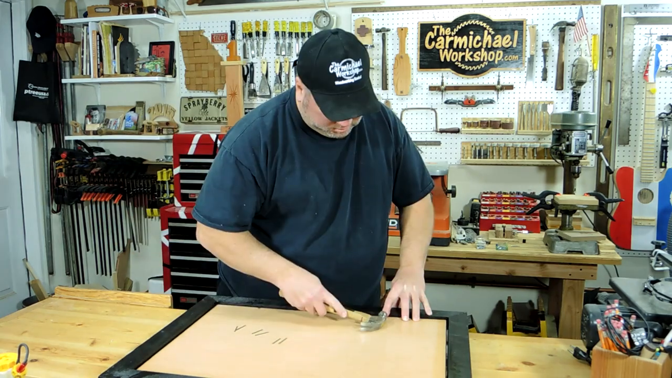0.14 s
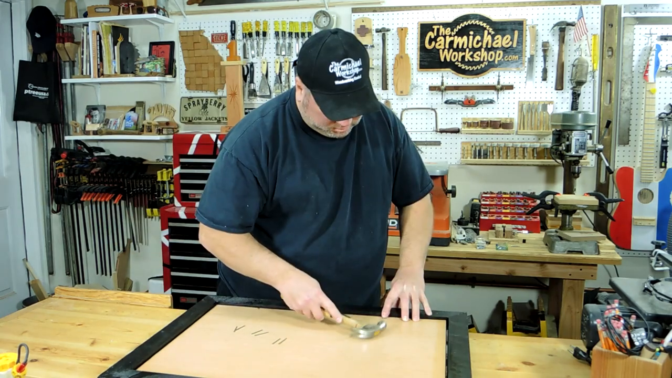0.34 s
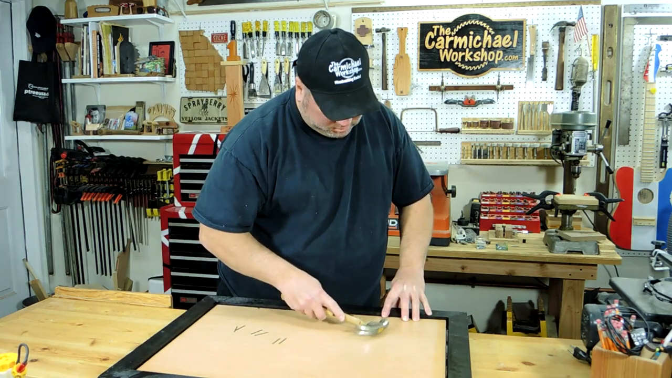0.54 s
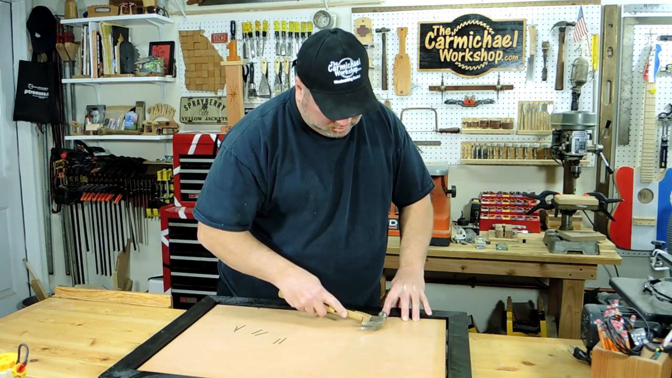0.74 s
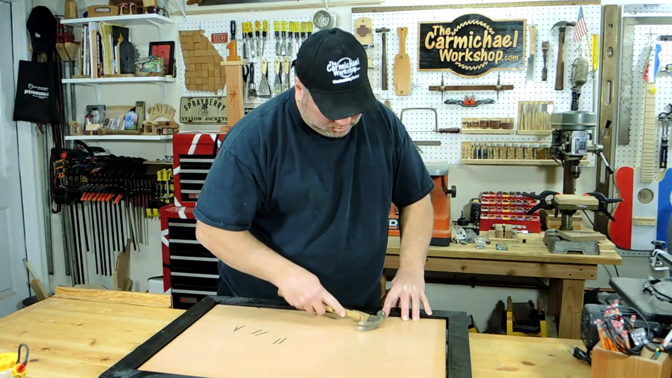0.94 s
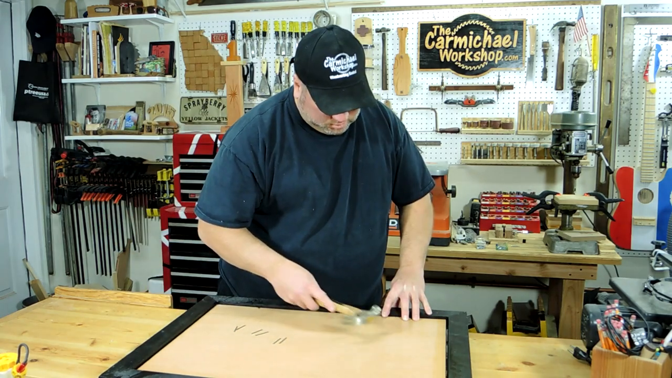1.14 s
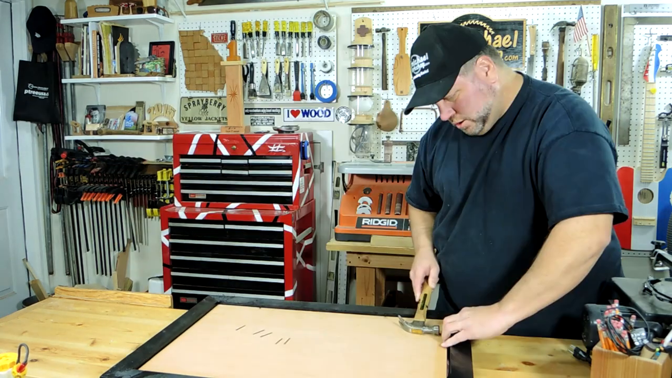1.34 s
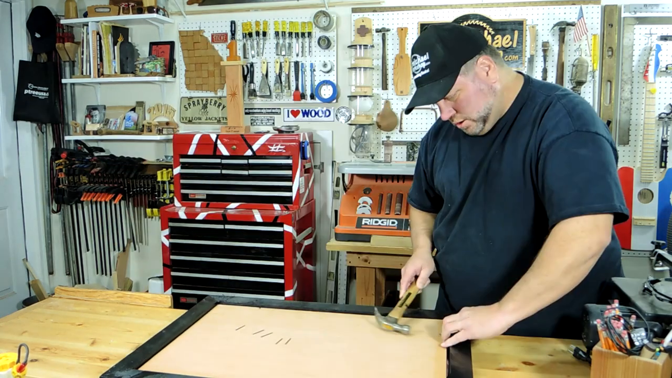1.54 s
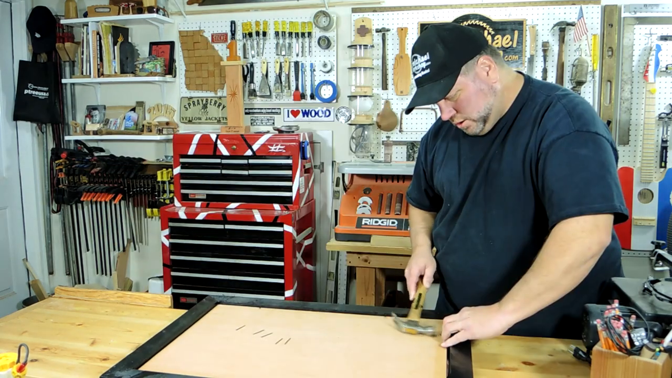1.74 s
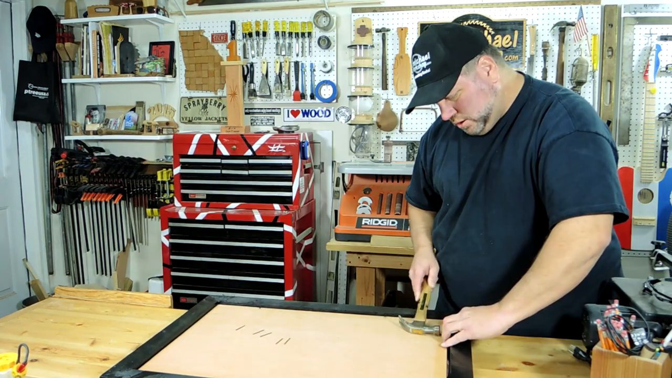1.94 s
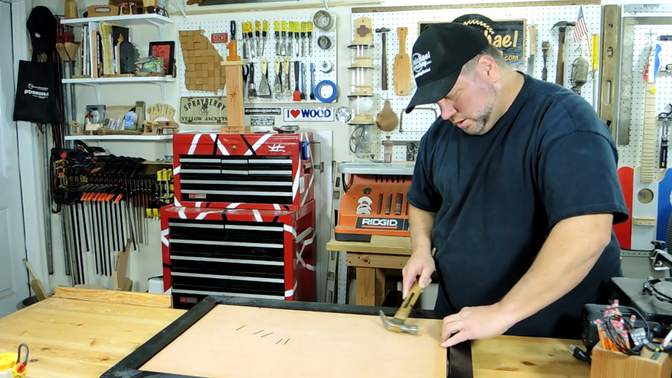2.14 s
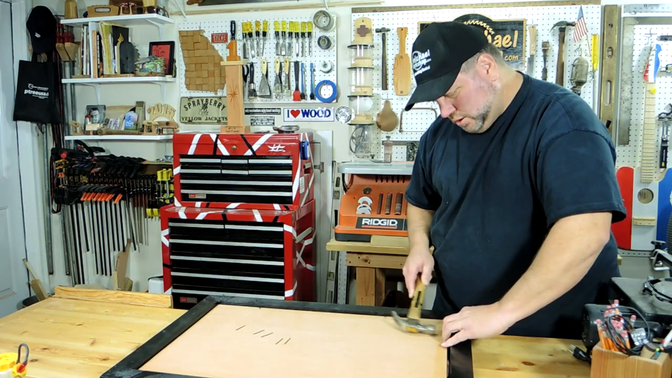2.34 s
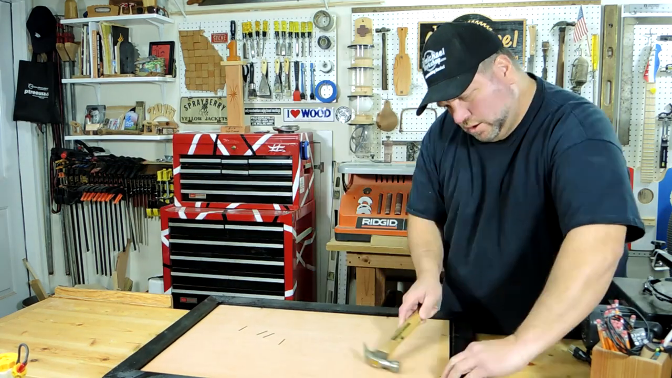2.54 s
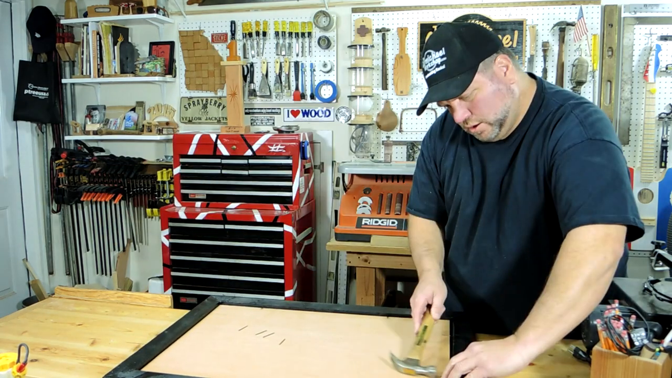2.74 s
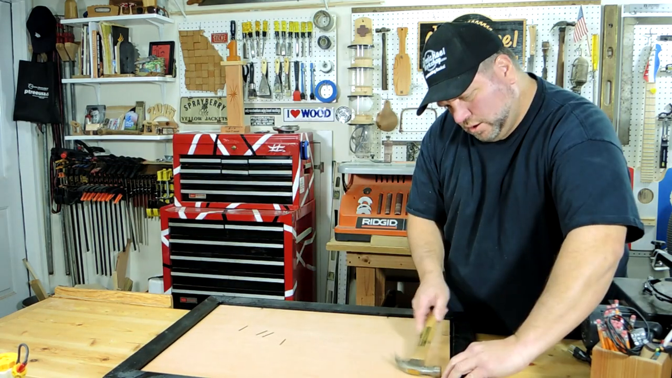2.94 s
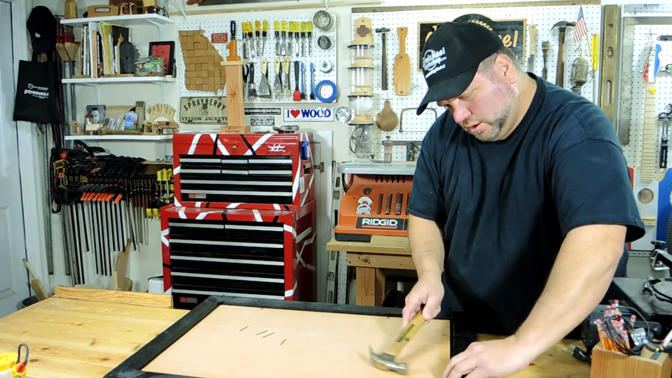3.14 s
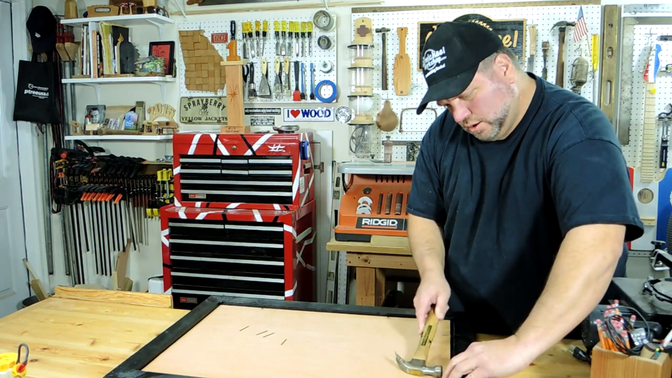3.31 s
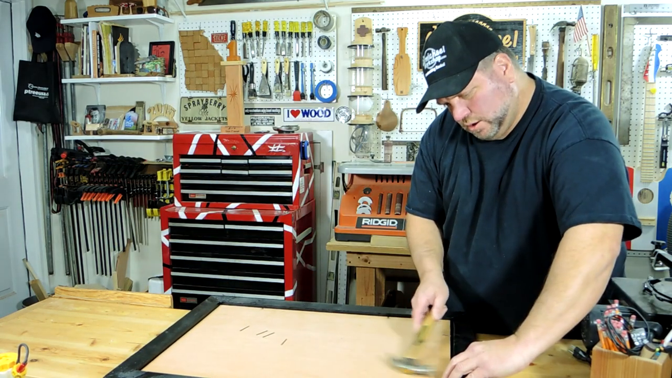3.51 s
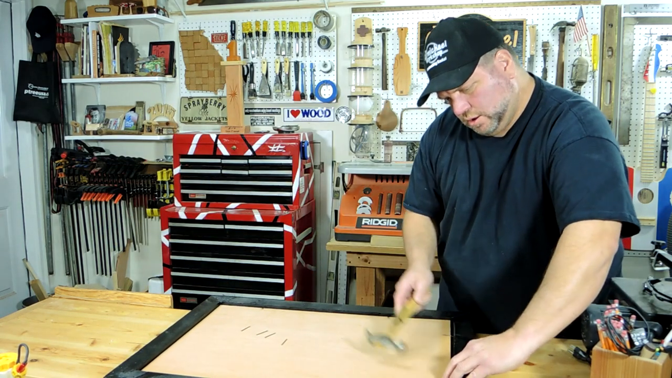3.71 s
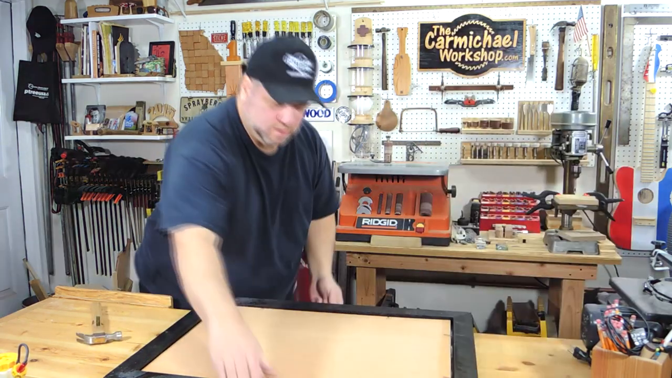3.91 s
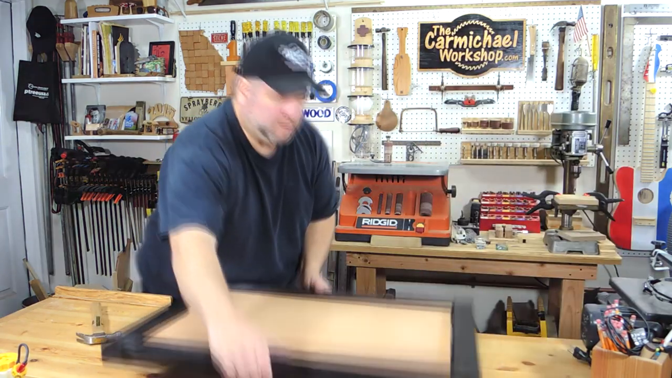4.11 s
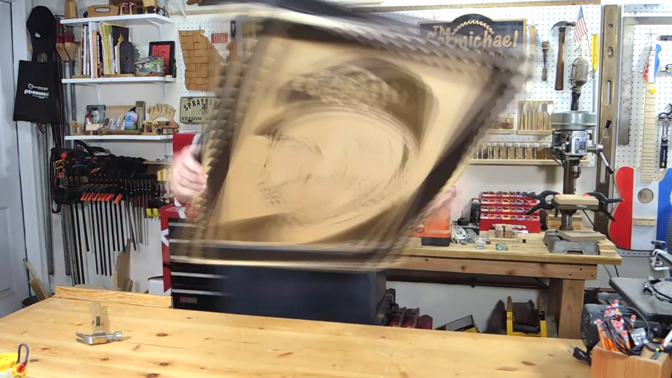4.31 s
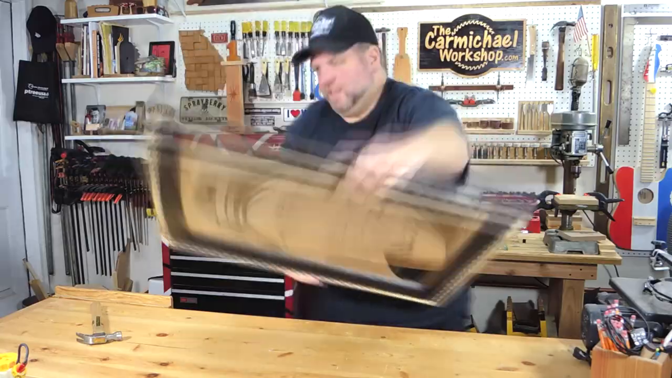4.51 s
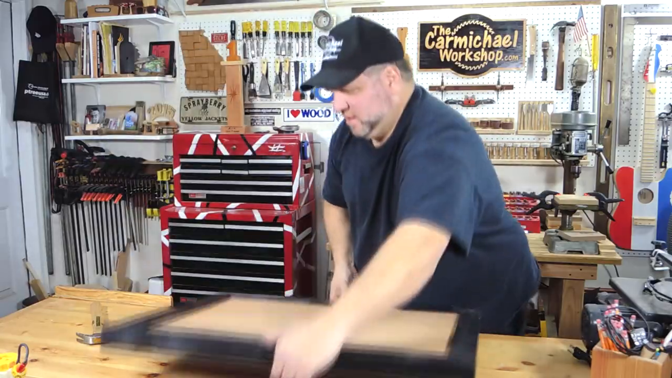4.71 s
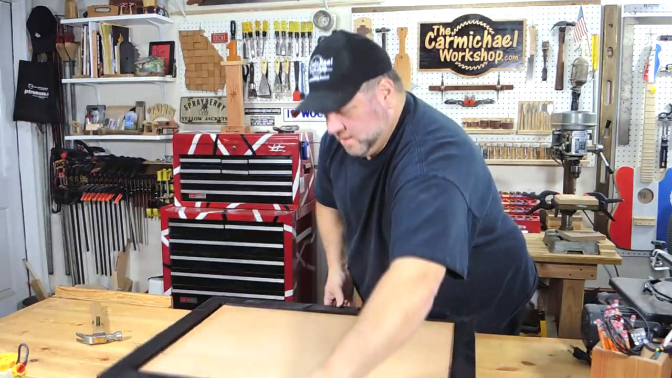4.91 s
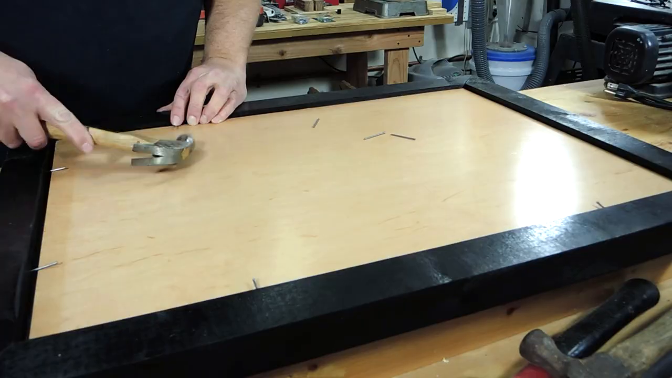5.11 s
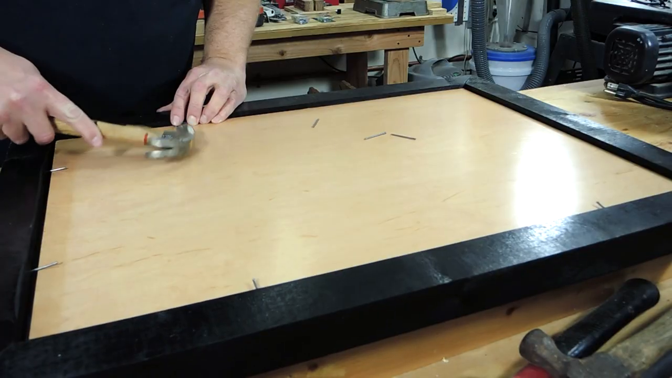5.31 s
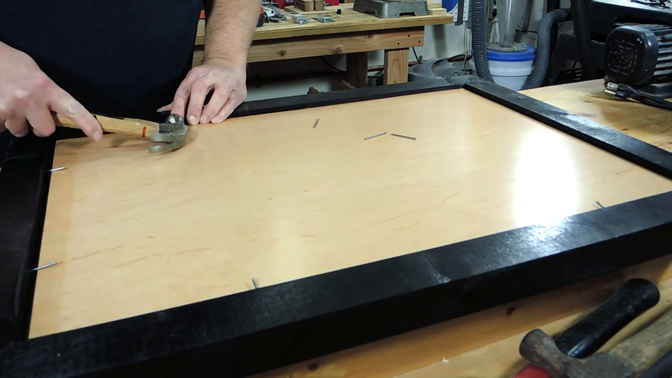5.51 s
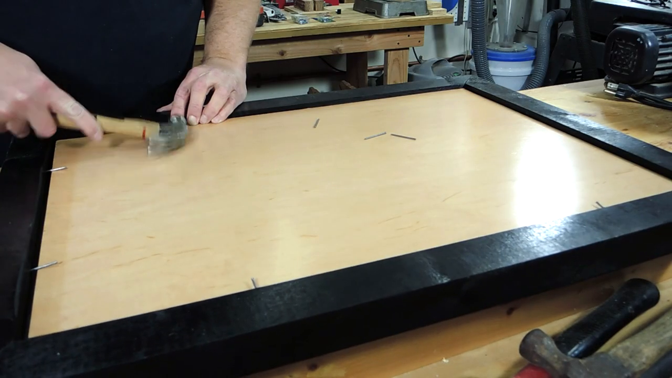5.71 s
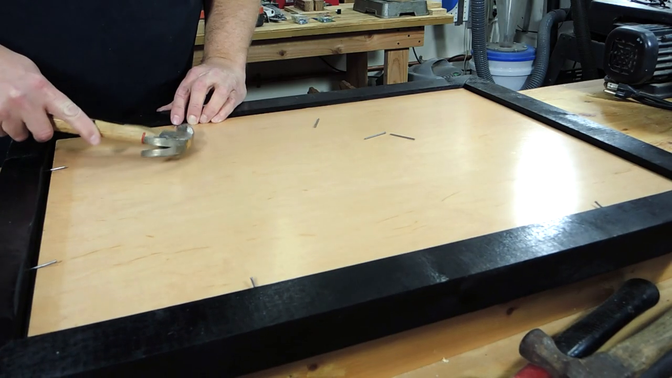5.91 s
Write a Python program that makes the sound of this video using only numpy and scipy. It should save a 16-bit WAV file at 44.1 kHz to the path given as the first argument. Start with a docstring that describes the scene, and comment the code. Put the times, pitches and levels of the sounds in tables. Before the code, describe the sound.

A small hammer drives nails sideways into a wooden frame, sliding on its thin backing panel, in a hard-walled workshop. From 0 to 1.3 s, four taps at about 0.18, 0.48, 0.75 and 1.03, each preceded by a breathy, gritty scrape back and a quick forward push, most with a small pre-knock. A cut, then four sharper, steelier taps at 1.42, 1.73, 2.03 and 2.3. Another cut and four more, 2.74 to 3.63, with longer rattle. Very faint nail clicks near 0.55 and 1.25. From 3.9 to 5.06 hammering stops: soft double bump at 4.1, faint rustle around 4.4-4.7, a light knock at 4.6, thuds at 4.8 and the heaviest set-down around 4.98. Cut to a close view: louder, clearer scrapes and hard, woody taps at 5.26, 5.53 and 5.8, then the start of another scrape. Quiet ventilation, faint hum, short reflective tails; loud blows overload the microphone.

```python
"""Small hammer on a wooden frame

In a hard-walled workshop a small hammer slides over a frame's thin backing panel and drives nails sideways
into the rim. Blows are steel noise bursts plus pushes that ring panel modes, each with a room tail; the slide is
speed-driven filtered noise. Five shots, close and wide, are joined by cuts. In the fourth the frame is lifted,
turned and set down, heard as thuds and a rustle of noise. Loose nails tick over room tone and a sine hum.
One microphone hears it all, its input overloaded by the loud blows."""
import sys
import numpy as np
from scipy import signal
from scipy.fft import rfft, irfft, next_fast_len
from scipy.io import wavfile
from scipy.ndimage import uniform_filter1d

SR = 44100
rng = np.random.default_rng(int(sys.argv[2]) if len(sys.argv) > 2 else 0)


def transcribe(signal):
    """Save signal, clipped to [-1, 1], as a 16-bit WAV file at the path in sys.argv[1]."""
    frames = np.atleast_2d(signal).T
    limited = np.clip(frames, -1, 1)
    pcm = np.round(limited * 32767).astype(np.int16)
    wavfile.write(sys.argv[1], SR, pcm)


N = 262836

# Start of each shot and end of the last: time [s]
SHOT_EDGES = [0, 1.288, 2.59, 3.89, 5.058, 5.96]

# Hammer contacts: (time [s], steel crack before its envelope [dB], panel knock [dB],
# extra on rim mode [dB], extra on lower rail mode [dB], extra on upper rail mode [dB])
BLOWS = [(0.1628, -14.5, -23, 7, 3, 5), (.182, -7.5, -17.5, -0.5, -12, -1), (.46, -18.5, -28.5, 3, -6, 1),
         (.48, -7.5, -16.5, -0.5, -14, 0), (0.729, -16, -24, 3, 3, 7.5), (0.751, -6.5, -17.5, 1, -16, -17),
         (1.005, -13, -21.5, 9, 13, 6), (1.0257, -8, -17, -1, -15, -1), (1.405, -22, -29, -1, -12, -6),
         (1.4244, 2, -16.5, -3, 0, -1), (1.715, -24, -30.5, 0, -1, 1), (1.73, 0, -16.5, 0.5, 4.5, 1.5),
         (2.0149, -24, -35.5, -7, -12, 6), (2.0258, -1.5, -17, 4, 4.5, 2.5),
         (2.2965, -3, -15, 6, -4.5, 1.5), (2.7142, -23, -34, 1, -15, -11),
         (2.742, -2.5, -18.5, -0.5, 0.5, 7.5), (3.014, -30, -41, 1, -12, -13), (3.042, -2, -18, -4, 2, 3),
         (3.315, -23.5, -35.5, -2, -8, -5), (3.3396, -4, -19, -2, 7.5, 2.5),
         (3.5872, -28, -35.5, -3, -6, -1), (3.6253, -5, -18, 4, 2, 8.5), (5.2, -43, -34, 14, 5, 3),
         (5.252, -45, -12.5, -4, -10, -5), (5.2606, 2, -15, -7, -16, -16), (5.5182, -13, -16, -2.5, -2, -1),
         (5.531, 1.5, -13, -2.5, -5, 9), (5.794, -23, -15, -3.5, -10, 5), (5.799, 1, -15, -0.5, -1, 12)]
# Direct steel crack before dulling: (frequency [Hz], level [dB])
CRACK_COLOUR = [(800, 15), (2000, 6.5), (5000, 7.5), (10000, -6), (16000, -13)]
# Steel crack as the room answers it: (frequency [Hz], level [dB])
CRACK_ROOM_COLOUR = [(500, -15.5), (1500, 10.5), (3000, 2), (5200, 4), (6500, 3), (9000, -6.5),
                     (13000, -17), (16000, -34)]
# Room and rattle, one row per shot: (room re crack [dB], room re knock [dB], rattle t60 [s])
SHOT_ROOM = [(-22, 1.8, 0.073), (-24.5, 1.8, 0.058), (-18.5, 3.74, 0.21), None, (-31.5, -8.5, 0.16)]
# Decay of the hard-walled room: (frequency [Hz], t60 [s])
ROOM_T60 = [(100, 0.19), (260, 0.54), (700, 0.45), (1800, 0.4), (5000, 0.39), (13000, 0.22)]
FIRM_DB, DULL_PER_DB = -12, .4  # weaker cracks lose treble: slope grows by this for each dB below
LEVEL_S = .0227  # knock and room levels are the rms their energy would hold for this long (s)
FIRST_CONTACT_DB = 23  # first push over the start of the rattle

# Panel and frame modes: (frequency [Hz], width at damping 1 [Hz])
MODES = [(45, 30), (135, 50), (205, 60), (285, 70), (355, 65), (460, 90), (600, 70), (770, 130), (960, 80),
         (1170, 120), (1350, 150), (1560, 60), (1715, 55), (2140, 150), (2580, 170), (3300, 130),
         (3950, 300), (5150, 500)]
# Strength of the modes at the spot struck, one row per shot: (one level per mode [dB])
SPOTS = [(-34, -18.5, -13.5, -3, 0.98, -3.5, -2.5, -11, -6.5, -8, -12.5, -19, -12, -18.5, -24.5, -16, -19, -19),
         (-53, -28, -15, -2, 1, -4, -2, -8.5, -7.5, -15, -13, -7.5, -5, -20, -17, -24, -98, -17.5),
         (-72, -16, -9, -2, 0.79, -4.5, -1, -7.5, -5.5, -12.5, -13, -9, -9, -19.5, -18.5, -29.5, -106, -17.5),
         (-34, -8, -5, 0.5, 0.11, -3.5, -8.5, -10.5, -8, -14, -24, -16, -13, -20, -15, -24, -24, -26),
         (-25, -19.5, -9, 0, 1, -0.5, 2, -9, -2.5, -6, -8.5, -23, -22, -25, -37, -13.5, -17.5, -19.5)]

# Swings of the head, back then forward: (back start [s], turn [s], nail hit [s], hiss going back [dB],
# hiss going forward [dB], panel rumble [dB], lowest band at half speed [Hz])
SWINGS = [(-0.02, 0.119, .182, -39, -43, -34, 2150), (0.302, 0.428, .48, -38.5, -39.5, -36, 2380),
          (0.572, 0.703, .751, -44, -42, -37, 2470), (0.853, 0.95, 1.026, -39, -43, -36.5, 2240),
          (1.262, 1.36, 1.424, -42, -42, -38, 2160), (1.551, 1.664, 1.73, -43.5, -45, -40.5, 2220),
          (1.833, 1.96, 2.025, -43.5, -40.5, -41, 2150), (2.101, 2.234, 2.297, -42.5, -45.5, -42.5, 2110),
          (2.571, 2.684, 2.742, -43.5, -43, -40, 2350), (2.865, 2.976, 3.042, -46.5, -45, -42, 2450),
          (3.152, 3.281, 3.339, -46.5, -44, -43.5, 2420), (3.444, 3.568, 3.625, -48.5, -40.5, -43, 2330),
          (5.07, 5.195, 5.256, -33.5, -30, -32.5, 2340), (5.351, 5.465, 5.52, -32.5, -29.5, -33.5, 2350),
          (5.624, 5.737, 5.794, -32, -27, -34.5, 2360), (5.875, 5.967, 6.02, -33, -40, -34.5, 2290)]
# Singing bands of the slide: (multiple of lowest band [ratio], half-width to 1/e [octaves], level [dB])
SINGING_BANDS = [(1, 0.25, -4), (1.598, 0.13, -11.5), (2.1, 0.39, -25), (2.648, 0.064, -9)]
# Top fizz of the slide, close shot: (frequency [Hz], level [dB])
FIZZ_NEAR = [(6000, -13), (8000, 1), (10200, 10), (11000, -14), (14000, -5)]
# Top fizz of the slide, wide shots: (frequency [Hz], level [dB])
FIZZ_FAR = [(6000, -3), (8500, 6), (10200, 14), (11200, 0), (12800, -11), (14000, -15)]
# Slide, one row per shot: (fizz colour [table], extra fizz [dB], hiss change by the nail [dB])
SLIDE_SHOT = [(FIZZ_FAR, 0, 5), (FIZZ_FAR, 3.3, -29), (FIZZ_FAR, 5.6, -3), None, (FIZZ_NEAR, 0, -8)]
REST_SPEED, ARC_POWER, SPEED_UP_S = 0.081, 0.93, 0.037  # turn speed (0-1), arc exponent, run-up (s)
HISS_POWER, RUMBLE_POWER, FIZZ_POWER = 0.94, 0.24, 2.1  # how steeply each layer grows with speed
BAND_RISE = 0.063  # rise of the bands from speed 0 to 1, share of their half-speed pitch
TILT_BACK, TILT_TURN, TILT_CONTACT = (0, -12), -12.5, 4.4  # dB per octave: back arc ends, turn, nail
FIZZ_BACK_DB, FIZZ_TURN_DB, FIZZ_CONTACT_DB = -27, -23, -16  # re hiss, before the shot's extra
FIZZ_RISE_S, RUMBLE_LEAD_S = 0.059, .06  # fizz build-up after the turn, earlier start of rumble's arc
BROAD, PATCHY_DB = 0.78, 3  # broad hiss under the bands (gain), rms depth of random patches

# Loose nails clicking on the panel: (time [s], level [dB])
TICKS = [(.548, -43), (1.2494, -52)]
# Colour of a nail click: (frequency [Hz], level [dB])
TICK_COLOUR = [(3000, -26), (6000, 5), (12000, -9.5), (15000, -7)]

# Frame bumping hands and bench: (time [s], level [dB], thud [Hz], t60 [s], rise [s], rattle re thud [dB])
BUMPS = [(4.082, -33, 420, 0.047, 0.0033, -15), (4.099, -32.5, 362, 0.1, 0.0031, -23),
         (4.596, -44.5, 868, .14, 0.0013, 5), (4.789, -29.5, 331, 0.097, 0.0037, -24),
         (4.802, -21, 273, 0.08, 0.0017, -16), (4.863, -33.5, 277, 0.05, 0.0038, -19),
         (4.88, -38, 245, 0.065, 0.0031, -20), (4.955, -55, 354, 0.092, 0.0063, -2),
         (4.977, -18, 278, 0.15, 0.014, -16), (4.987, -14.5, 311, 0.075, 0.0036, -14),
         (5.011, -24, 283, 0.13, 0.0049, -24)]
# Colour of the faint rattle on a bump: (frequency [Hz], level [dB])
RATTLE_COLOUR = [(70, -18), (160, 9), (300, 5.5), (700, 11.0), (1500, -2.5), (4000, -12.5), (12000, -40)]

# Hands and air on the turning frame: (time [s], level [dB])
SWISH = [(4.2, -71), (4.39, -67), (4.42, -54.5), (4.45, -65), (4.49, -51), (4.53, -61), (4.66, -68),
         (4.72, -58), (4.78, -67), (4.97, -64)]
# Colour of that rustle: (frequency [Hz], level [dB])
SWISH_COLOUR = [(200, -3), (500, -0.5), (1200, -2.5), (2500, -14), (8000, -33)]

# Room tone colour: (frequency [Hz], relative spectral density [dB])
AIR = [(15, -45), (25, -17), (60, -18), (91, -8), (122, -8.5), (168, -7), (244, -6), (301, -3.5),
       (703, -9.5), (1100, -15), (1190, -16.5), (4030, -19.5), (14000, -33.5)]
# Mains hum of the lights: (frequency [Hz], rms level [dB])
HUM = [(123.8, -73.5), (242.2, -71.5)]

# Overall tone, bass slightly reduced, treble falling steeply above 14 kHz: (frequency [Hz], gain [dB])
OVERALL_TONE = [(20, -1), (80, -3), (115, 0), (13800, 0), (14500, -14), (15600, -17), (16300, -30)]
TOP_HZ = 16300  # nothing passes from here up


def amp(db):
    """Decibels to gain."""
    return 10 ** (np.asarray(db) / 20)


def unit(x):
    """Scaled to rms 1."""
    return x / np.sqrt(np.mean(x ** 2) + 1e-20)


def along(points, hz):
    """Values of (frequency, value) points read off a log frequency axis."""
    f, v = np.transpose(points)
    return np.interp(np.log(hz + 1), np.log(f + 1), v)


def filtered(x, response):
    """Sound shaped by a complex response of frequency."""
    m = next_fast_len(len(x) + 8192)
    return irfft(rfft(x, m) * response(np.fft.rfftfreq(m, 1 / SR)), m)[:len(x)]


def coloured_noise(length, points):
    """White noise given a colour, at rms 1."""
    return unit(filtered(rng.standard_normal(length), lambda hz: amp(along(points, hz))))


def held_level(x, db):
    """Sound scaled so that its energy equals LEVEL_S seconds at rms level db."""
    return amp(db) * np.sqrt(LEVEL_S * SR) * x / np.linalg.norm(x)


def shot_of(s):
    """Index of the shot that holds time s."""
    return int(np.searchsorted(SHOT_EDGES, s, side="right")) - 1


def add(track, s, sound):
    """Mix a sound in at s; the next cut ends it."""
    a = round(s * SR)
    b = min(round(SHOT_EDGES[shot_of(s) + 1] * SR), N)
    track[a:b][:len(sound)] += sound[:b - a]


def hammer():
    """Each contact is a short steel crack plus a rattling push that rings the panel; the room answers both."""
    out = np.zeros(N)
    t = np.arange(SR // 5) / SR
    for s, crack_db, knock_db, *extra_db in BLOWS:
        shot = shot_of(s)
        crack_wet_db, knock_wet_db, rattle_t60 = SHOT_ROOM[shot]
        wood = panel(shot, *extra_db)

        dull_db = DULL_PER_DB * min(crack_db - FIRM_DB, 0)
        noise = rng.standard_normal(len(t))
        crack = unit(filtered(
            noise, lambda hz: amp(along(CRACK_COLOUR, hz) + dull_db * np.log2(1 + hz / 3000))))
        crack = crack * amp(-60 * t / 0.02) * (1 - np.exp(-t / 0.00066))

        rattle = rng.standard_normal(len(t)) * amp(-60 * t / rattle_t60)
        first_push = amp(FIRST_CONTACT_DB - 60 * t / 0.00081)
        knock = filtered(rattle + first_push, wood)

        add(out, s, amp(crack_db) * crack + held_level(knock, knock_db))
        crack_tail = room(lambda hz: amp(along(CRACK_ROOM_COLOUR, hz)), crack_db + crack_wet_db)
        add(out, s, crack_tail + room(wood, knock_db + knock_wet_db))
    return out


def panel(shot, rim_db=0, low_rail_db=0, high_rail_db=0, damping=1):
    """Causal sum of resonances as struck in one shot, with extra level on the rim and rail modes."""
    extra_db = [rim_db * (500 < hz < 700)
                + low_rail_db * (1400 < hz < 1640)
                + high_rail_db * (1640 < hz < 1900) for hz, _ in MODES]
    strength_db = np.add(SPOTS[shot], extra_db)

    def response(f):
        """Band-pass modes with alternating sign."""
        total = 0
        for k, ((centre, width), db) in enumerate(zip(MODES, strength_db)):
            loss = 1j * f * width * damping
            total = total + (-1) ** k * amp(db) * loss / (centre * centre - f * f + loss)
        return total
    return response


def room(response, db):
    """A fresh noise tail coloured by the source; each frequency dies at its own speed."""
    hz, t, z = signal.stft(rng.standard_normal(SR // 2), SR, nperseg=256)
    decay = amp(-60 * t / along(ROOM_T60, hz)[:, None])
    tail = signal.istft(z * decay, SR, nperseg=256)[1]
    onset = 1 - np.exp(-np.arange(len(tail)) / (0.00067 * SR))
    return held_level(filtered(tail, response) * onset, db)


def sliding():
    """Wood grain under the moving head: hiss with bands that rise with speed, top fizz and panel rumble."""
    out = np.zeros(N)
    for start, turn, contact, back_db, forward_db, rumble_db, band_hz in SWINGS:
        shot = shot_of(turn - .04)
        fizz_colour, more_db, ease_db = SLIDE_SHOT[shot]
        t = np.arange(round((contact - start + .05) * SR)) / SR + start - .04
        edge = np.clip((t - t[0]) / 0.053, 0, 1) * np.clip((t[-1] - t) / 0.0046, 0, 1)
        # noise of randomly varying strength makes the grit uneven
        grit = rng.standard_normal((3, len(t))) * amp(2 * rng.standard_normal((3, len(t))))

        hiss = grain_hiss(grit[0], t[0], start, turn, contact, band_hz)
        rumble = unit(filtered(grit[1], panel(shot, damping=1.5)))
        fizz = unit(filtered(grit[2], lambda f: amp(along(fizz_colour, f))))

        speed = speed_of(t, start, turn)
        rumble_speed = speed_of(t, start - RUMBLE_LEAD_S, turn)
        stroke_db = np.where(t < turn, back_db, forward_db)
        lift_db = np.interp(t, [min(turn + SPEED_UP_S, contact), contact + .001], [0, ease_db])
        fizz_forward_db = np.interp(t, [turn, turn + FIZZ_RISE_S], [FIZZ_TURN_DB, FIZZ_CONTACT_DB])
        fizz_db = np.where(t < turn, FIZZ_BACK_DB, fizz_forward_db)

        sound = amp(stroke_db + lift_db) * speed ** HISS_POWER * hiss
        sound = sound + amp(rumble_db) * rumble_speed ** RUMBLE_POWER * rumble
        sound = sound + amp(stroke_db + fizz_db + more_db) * speed ** FIZZ_POWER * fizz
        sound = edge * sound
        first = max(t[0], SHOT_EDGES[shot])
        add(out, first, sound[t >= first])
    return out


def grain_hiss(grit, begins, start, turn, contact, band_hz):
    """Grit noise through moving singing bands over a broad hump, with a changing tilt and random patches."""
    hz, frames, z = signal.stft(grit, SR, nperseg=256)
    when = frames + begins
    lowest_hz = band_hz * (1 + BAND_RISE * (speed_of(when, start, turn) - .5))
    octaves = np.log2((hz[:, None] + 1) / lowest_hz)
    bands = sum(amp(db) * np.exp(-((octaves - np.log2(k)) / width) ** 2)
                for k, width, db in SINGING_BANDS)
    broad = BROAD * np.exp(-((octaves - .4) / 1.2) ** 2)
    tilt_back = np.interp(when, [start, turn], TILT_BACK)
    tilt_forward = np.interp(when, [turn, contact], [TILT_TURN, TILT_CONTACT])
    tilt_db = np.where(when < turn, tilt_back, tilt_forward)
    shape = (broad + bands) * amp(tilt_db * octaves)
    shape = shape / np.linalg.norm(shape, axis=0)

    blotches = uniform_filter1d(rng.standard_normal(z.shape), size=3, axis=0)
    blotches = uniform_filter1d(blotches, size=4, axis=1)
    patches = amp(PATCHY_DB * unit(blotches))
    return unit(signal.istft(z * patches * shape, SR, nperseg=256)[1][:len(grit)])


def speed_of(t, start, turn):
    """Head speed 0-1: an arc going back, nearly still at the turn, then a quick run-up."""
    back = np.abs(np.sin(np.pi * np.clip((t - start) / (turn - start), 0, 1))) ** ARC_POWER
    forward = np.sin(np.pi / 2 * np.clip((t - turn) / SPEED_UP_S, 0, 1))
    return REST_SPEED + (1 - REST_SPEED) * np.where(t < turn, back, forward)


def handling():
    """Frame against hands and bench: low decaying sines and panel noise, with a rattle on top."""
    out = np.zeros(N)
    t = np.arange(SR // 4) / SR
    for s, db, thud_hz, t60, rise, rattle_db in BUMPS:
        shape = amp(-60 * t / t60) * (1 - np.exp(-(t / rise) ** 2))
        shape = shape / shape.max()
        wood = panel(shot_of(s), damping=1.15)
        noise = rng.standard_normal(len(t))
        # a soft contact carries little treble
        blur = unit(filtered(noise, lambda f: wood(f) / (1 + (f / (2.2 * thud_hz)) ** 4)))
        thud = np.sin(2 * np.pi * thud_hz * t) + .35 * np.sin(2 * np.pi * 1.65 * thud_hz * t) + .45 * blur
        rattle = coloured_noise(len(t), RATTLE_COLOUR)
        add(out, s, amp(db) * shape * (thud + amp(rattle_db) * rattle))
    return out


def swish():
    """Hands and air on the turning frame: soft noise whose level follows the movement."""
    s, db = np.transpose(SWISH)
    level_db = np.interp(np.arange(N) / SR, s, db, left=-120, right=-120)
    return amp(level_db) * coloured_noise(N, SWISH_COLOUR)


def nails():
    """Loose nails on the panel: faint bright clicks of quickly decaying noise."""
    out = np.zeros(N)
    t = np.arange(SR // 20) / SR
    for s, db in TICKS:
        add(out, s, amp(db - 60 * t / 0.023) * coloured_noise(len(t), TICK_COLOUR))
    return out


def room_tone():
    """Ventilation murmur and preamp hiss as steady coloured noise, with a faint hum of sines."""
    t = np.arange(N) / SR
    hum = sum(np.sqrt(2) * amp(db) * np.sin(2 * np.pi * hz * t) for hz, db in HUM)
    return hum + amp(-62) * coloured_noise(N, AIR)


def scene():
    """All sources at one microphone."""
    return (hammer() + sliding() + handling() + swish() + nails() + room_tone())[None]


def record(dry):
    """Input overload flattens the blows, the level dips to zero at each cut, then the overall tone."""
    x = dry[0] / (1 + np.abs(dry[0] / .215) ** 10) ** (1 / 10)
    t = np.arange(N) / SR
    from_cut = np.min(np.abs(t - np.array(SHOT_EDGES[1:-1])[:, None]), axis=0)
    x = x * np.clip(from_cut / 0.0042, 0, 1)
    return filtered(x, lambda hz: amp(along(OVERALL_TONE, hz)) * (hz < TOP_HZ))[None]


dry = scene()
out = record(dry)
transcribe(out)
```